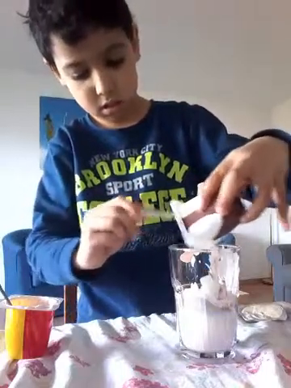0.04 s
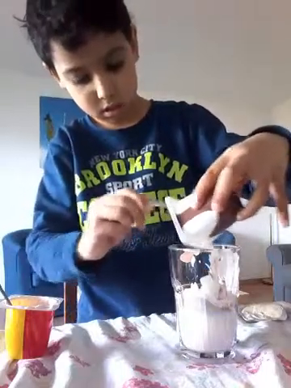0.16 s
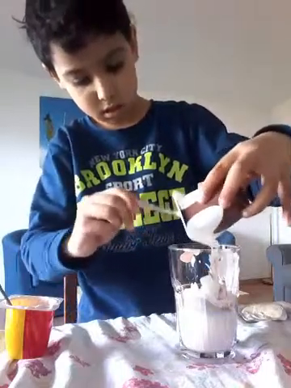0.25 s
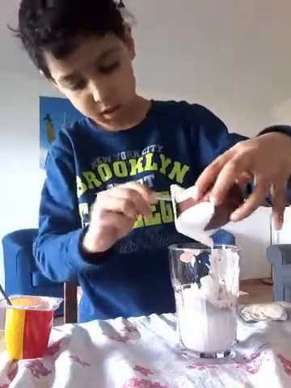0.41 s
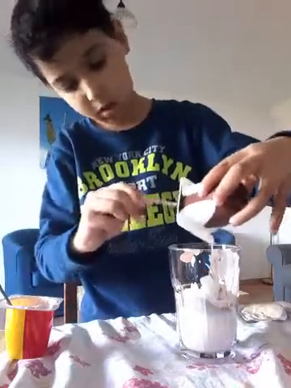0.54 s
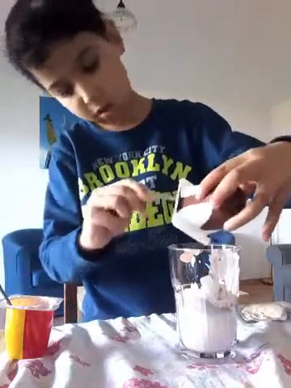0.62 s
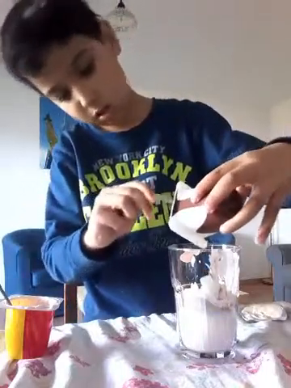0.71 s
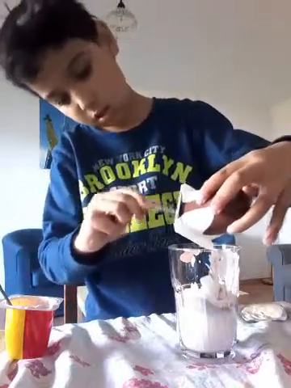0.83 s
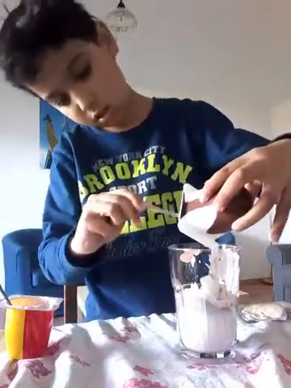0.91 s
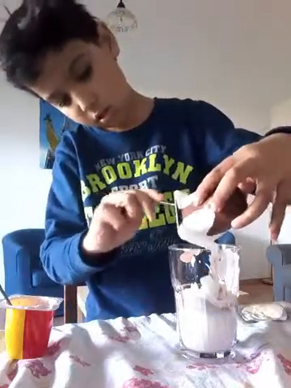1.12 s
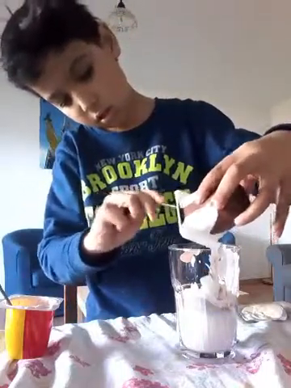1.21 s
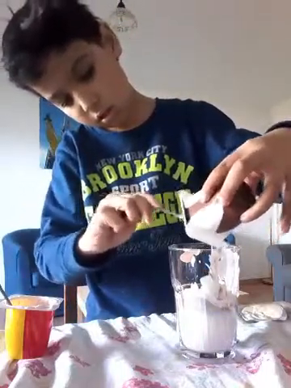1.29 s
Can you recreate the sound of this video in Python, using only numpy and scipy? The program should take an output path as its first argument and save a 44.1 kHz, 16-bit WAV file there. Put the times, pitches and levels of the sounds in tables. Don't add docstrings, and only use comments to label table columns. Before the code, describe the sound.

A spoon scrapes and knocks inside a small plastic dessert pot, with one loud snap early on

```python
import sys
import numpy as np
from scipy import signal
from scipy.io import wavfile

SR = 44100
rng = np.random.default_rng(int(sys.argv[2]) if len(sys.argv) > 2 else 0)


def ratio(d):
    e = np.asarray(d, float) / 20
    return 10 ** e


def master_out(mix):
    frames = np.transpose(np.atleast_2d(mix))
    ceiling = np.clip(frames, -1, 1)
    pcm = np.round(ceiling * 32767).astype(np.int16)
    wavfile.write(sys.argv[1], SR, pcm)


N = 59535
LEAD = SR // 4
M = N + LEAD


def rms_one(x):
    return x / np.sqrt(np.mean(x ** 2) + 1e-20)


def at_hz(points, hz):
    f, value = np.array(points).T
    return np.interp(np.log(hz), np.log(f), value)


def bands(count, gain):
    edges = 20 * 2 ** np.arange(0, 10, .5)
    white = rng.standard_normal((2, count))
    total = 0
    for k, (lo, hi) in enumerate(zip(edges, edges[1:])):
        sos = signal.butter(2, [lo, hi], "band", fs=SR, output="sos")
        total = total + gain(np.sqrt(lo * hi)) * signal.sosfilt(sos, white[k % 2])
    return total


def ring(x, hz, t60):
    r = ratio(-60 / (max(t60, .0003) * SR))
    w = 2 * np.pi * hz / SR
    return signal.lfilter([0, np.sin(w)], [1, -2 * r * np.cos(w), r * r], x + 1e-18)


def struck(hits, modes):
    swell, focus_cycles = 8.0, 4.5
    out, t = np.zeros(M + SR), np.arange(2048) / SR
    for s, db, contact_s in hits:
        u = t / max(contact_s, 1e-4)
        press = (1 - np.exp(-swell * u)) * np.exp(-u)
        chatter = rng.standard_normal((len(modes), t.size)) * press
        chatter = np.pad(chatter, [(0, 0), (0, SR // 2)])
        sound = 0
        for row, (hz, mode_db, t60) in zip(chatter, modes):
            felt = ring(row, hz, focus_cycles / hz)
            mode = ring(felt, hz, t60)
            sound = sound + ratio(mode_db) * mode / np.abs(mode).max()
        i = LEAD + int(s * SR)
        out[i:i + sound.size] += ratio(db) * sound / np.abs(sound).max()
    return out[:M]


def above(hz, x):
    return signal.sosfilt(signal.butter(4, hz, "high", fs=SR, output="sos"), x)


# (f/Hz, level/dB per Hz)
AIR_COLOUR = [(25, -21), (60, -26.5), (130, -27), (200, -20), (500, -11.5), (1400, -15), (3840, -25.5),
              (6000, -28.5), (16000, -30.5)]
# (multiple of its pitch, level/dB)
FRIDGE_OVERTONES = [(4, -74.5), (5, -77), (6, -79), (7, -82), (9, -87.5)]


def background():
    t = np.arange(M) / SR
    hum_hz, air_db = 116.3, -62
    hum = 0
    for k, db in FRIDGE_OVERTONES:
        hum = hum + 2 * ratio(db) * np.sin(2 * np.pi * (round(k) * hum_hz * t + rng.random()))
    air = bands(M, lambda hz: ratio(at_hz(AIR_COLOUR, hz)))
    return ratio(air_db) * rms_one(air) + hum


# (f/Hz, t60/s)
ROOM_RING = [(200, 0.46), (700, 0.38), (1500, 0.43), (3000, 0.38), (6000, 0.36), (12000, 0.21)]
# (f/Hz, level/dB)
ROOM_ANSWER = [(200, -8.5), (750, -1), (1070, -2.5), (1500, 2.5), (2150, -6), (3000, -6.5), (4300, -10.5),
               (7000, 2.9)]


def kitchen(x):
    room_db, early_db, early_s = -9, -1, .013
    first_echo_s, build_s = .018, .002
    t = np.arange(SR // 2) / SR
    scatter = ratio(early_db) * (t > .002) * np.exp(-t / early_s)
    walls = np.clip((t - first_echo_s) / build_s, 0, 1)
    fading = bands(t.size, lambda hz: ratio(at_hz(ROOM_ANSWER, hz) - 60 * t / at_hz(ROOM_RING, hz)))
    tail = (scatter + walls) * fading
    return ratio(room_db) * signal.fftconvolve(x, tail / np.sqrt(np.sum(tail ** 2)))[:M]


# (start t/s, rise t/s, fall t/s, level/dB)
DRAG_STROKES = [
    (-.02, 0.0067, 0.052, -46.5),
    (.434, 0.0015, 0.011, -53),
    (0.492, 0.036, 0.072, -55.5),
    (.77, 0.142, 0.012, -62),
    (1.165, 0.0096, .015, -55.5),
    (1.26, 0.057, 0.077, -58),
]
# (f/Hz, width f/Hz, level/dB)
DRAGGED_WALL = [(625, 190, -2), (970, 690, 0.5), (1353, 220, -2.5), (2360, 1800, -4.5), (3150, 200, -5.5),
                (3960, 250, -6.4), (4650, 300, -4.5), (7260, 3000, -13)]


def drags():
    slips_per_s, slip_spread_db = 2500, 1.8
    t = (np.arange(M) - LEAD) / SR
    press = 0
    for s, rise, fall, db in DRAG_STROKES:
        press = press + ratio(db) * np.interp(t, [s, s + rise, s + rise + fall], [0, 1, 0])
    slips = rng.random(M) < slips_per_s / SR
    slips = slips * ratio(slip_spread_db * rng.exponential(1, M))
    slips = slips * rng.choice([-1, 1], M)
    body = 0
    for k, (hz, width_hz, db) in enumerate(DRAGGED_WALL):
        t60 = np.log(1000) / np.pi / width_hz
        body = body + (-1) ** k * ratio(db) * rms_one(ring(slips, hz, t60))
    return press * rms_one(body)


# (t/s, peak level/dB, contact t/s)
SCUFF_HITS = [
    (.4347, -54, 0.0027),
    (.5355, -50.5, 0.0016),
    (.547, -55, .002),
    (.557, -46, 0.0031),
    (.896, -41, 0.0044),
    (.9402, -41, .0015),
]
# (f/Hz, level/dB, t60/s)
TIP_MODES = [(597, -9, 0.005), (1175, 3, 0.041), (2515, -0.5, 0.0055), (3470, -9, 0.0068), (4380, -1, .015),
             (4470, -7.5, 0.01), (4760, -0.5, 0.016), (6660, -8.5, 0.0018)]


def scuffs():
    return struck(SCUFF_HITS, TIP_MODES)


# (t/s, peak level/dB, contact t/s)
CHIME_HITS = [
    (.146, -55, .002),
    (.4348, -48, .0006),
]
# (f/Hz, level/dB, t60/s)
SPOON_MODES = [
    [(2400, -5, .15), (4805, 0, .5)],
    [(4200, 0, .04), (4420, -3, .07)],
]


def chimes():
    return sum(struck([hit], modes) for hit, modes in zip(CHIME_HITS, SPOON_MODES))


# (t/s, peak level/dB, contact t/s)
THUD_HITS = [
    (.7682, -38, 0.0013),
]
# (f/Hz, level/dB, t60/s)
CREAM_MODES = [(295, -9.5, 0.029), (430, -2, 0.043), (603, -1.5, 0.029), (972, -4, 0.028),
               (1376, -4, 0.039), (2640, -14, 0.018), (3440, -11, 0.011), (4470, -6.5, 0.03)]


def thuds():
    return struck(THUD_HITS, CREAM_MODES)


# (t/s, peak level/dB, contact t/s)
KNOCK_HITS = [
    (.4555, -28, 0.0027),
    (1.1525, -39.5, 0.0048),
]
# (f/Hz, level/dB, t60/s)
FLOOR_MODES = [(212, -29, 0.034), (323, -16, 0.018), (444, -16, 0.0236), (574, 0, 0.038), (732, -12, 0.019),
               (872, -6.5, 0.057), (1015, -3.5, 0.059), (1323, 2, 0.068), (1460, -7, 0.068),
               (1920, -6.5, 0.017), (2500, -13.5, 0.0062), (3290, -7.5, 0.0048), (4345, -8.5, 0.021),
               (7050, -18, .004)]


def knocks():
    return struck(KNOCK_HITS, FLOOR_MODES)


# (t/s, peak level/dB, contact t/s)
TICK_HITS = [
    (.1448, -31, 0.0024),
    (1.174, -47, 0.0083),
]
# (f/Hz, level/dB, t60/s)
RIM_MODES = [(265, -17.5, 0.042), (694, -22.5, .02), (1240, -17.5, .015), (2500, -2.5, 0.0089),
             (2540, -3, 0.018), (2950, -8, 0.0089), (3250, 1, 0.0077), (3816, -7, 0.0062), (4350, 4.5, .01),
             (5600, -13, 0.0045), (7620, -33.5, .004)]


def ticks():
    return struck(TICK_HITS, RIM_MODES)


# (t/s, peak level/dB, contact t/s)
SNAP_HITS = [
    (-.09, -10.5, 0.00074),
    (.1955, -32.5, 0.0018),
    (.2012, -9, 0.00035),
    (.2068, -26, 0.0022),
]
# (f/Hz, level/dB, t60/s)
WALL_MODES = [(571, -27, 0.049), (803, -14, 0.031), (1378, -11.5, .022), (1572, -16, 0.015),
              (1674, -1, 0.0086), (1895, -3.5, .011), (2790, -8.5, 0.013), (3272, -2, 0.013),
              (3910, -14, 0.0046), (4300, -4.5, .01), (4927, -4, 0.0052), (5883, -21.5, .003),
              (7530, -30, .003), (12500, -36, .0015)]


def snaps():
    return struck(SNAP_HITS, WALL_MODES)


def scene():
    pot = ticks() + scuffs() + knocks() + thuds() + drags()
    pot = pot + chimes()
    pot = above(183, pot) + above(430, snaps())
    return (pot + kitchen(pot) + background())[None, LEAD:]


# (from t/s, to t/s, lift level/dB)
LISTENING = [
    (-.05, 0.041, 4.5),
    (0.139, 0.38, 9.5),
    (0.42, 0.554, 7.5),
    (0.767, 0.945, 2.5),
    (1.155, 1.175, 6),
    (1.275, 1.4, 2.5),
]


def suppress_noise(dry):
    shut_db, spared_hz, fade_s = -5.5, 191.2, 0.033
    t = np.arange(N) / SR
    gain_db = shut_db
    for a, b, db in LISTENING:
        gain_db = gain_db + db * np.interp(t, [a - .002, a, b, b + fade_s], [0, 1, 1, 0])
    bass = signal.sosfiltfilt(signal.butter(2, spared_hz, fs=SR, output="sos"), dry)
    return bass + ratio(gain_db) * (dry - bass)


def roll_off(x):
    return signal.sosfilt(signal.butter(12, 16470, fs=SR, output="sos"), x)


def record(dry):
    top_hz, offset = 15850, -.0004
    treble_cut = signal.ellip(10, .5, 22, top_hz, fs=SR, output="sos")
    heard = signal.sosfilt(treble_cut, suppress_noise(dry))
    return roll_off(heard + offset)


dry = scene()
out = record(dry)
master_out(out)
```